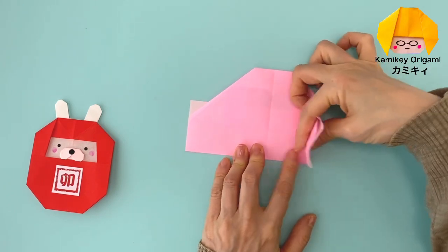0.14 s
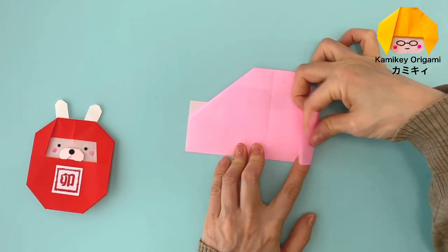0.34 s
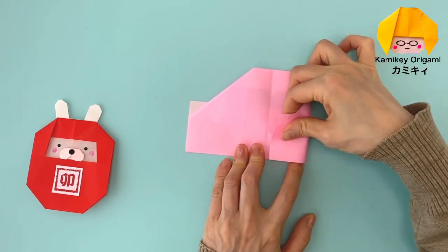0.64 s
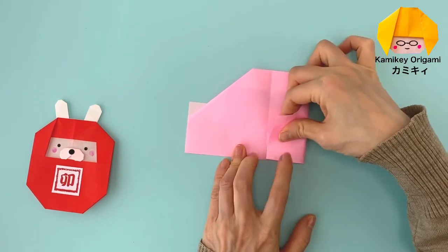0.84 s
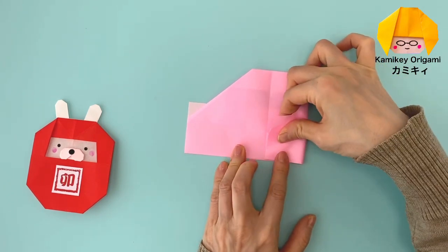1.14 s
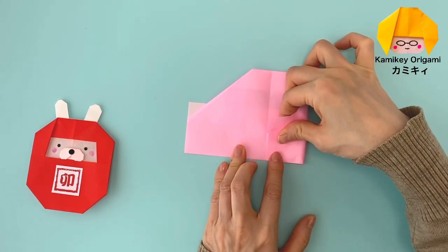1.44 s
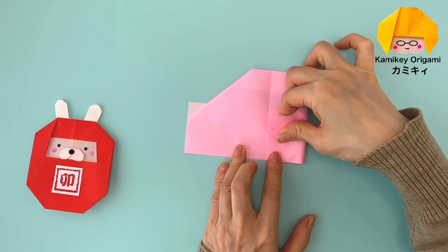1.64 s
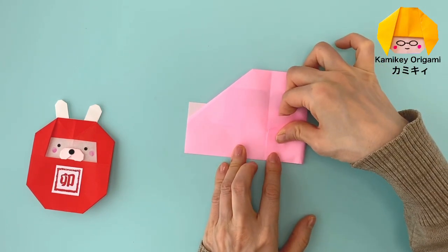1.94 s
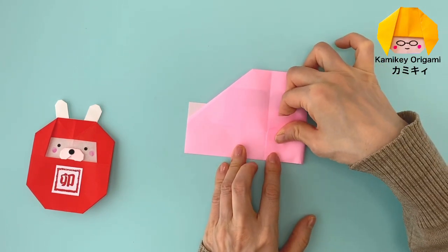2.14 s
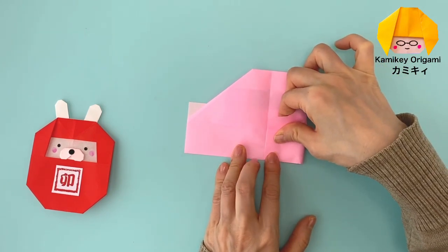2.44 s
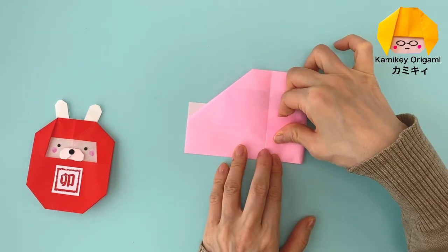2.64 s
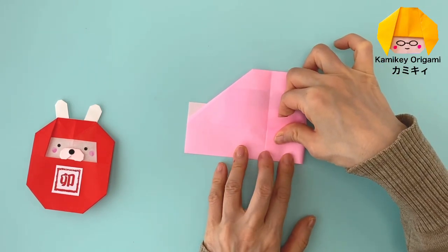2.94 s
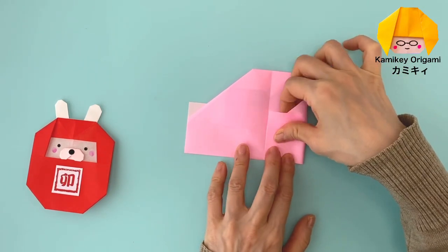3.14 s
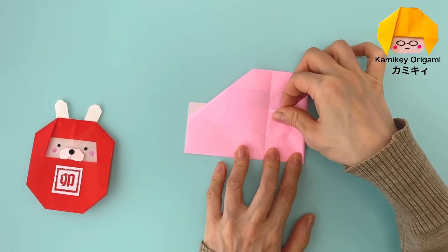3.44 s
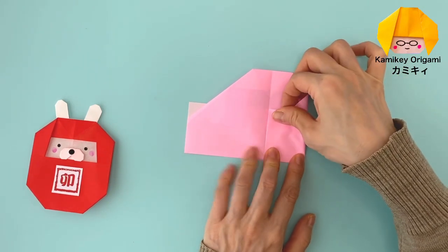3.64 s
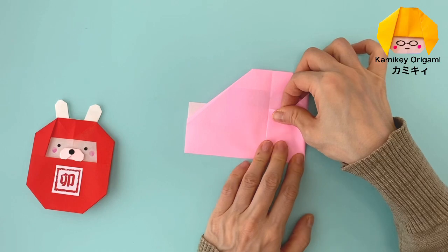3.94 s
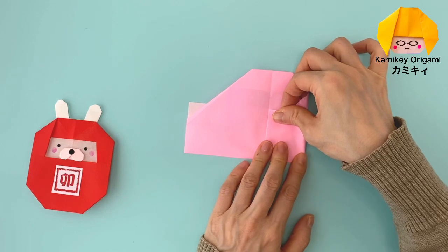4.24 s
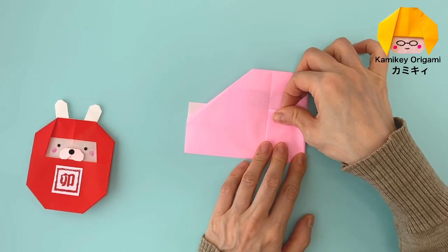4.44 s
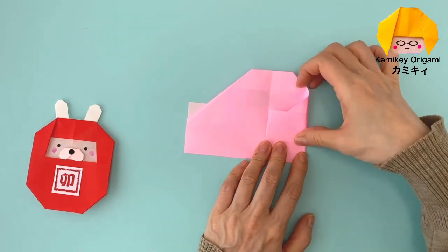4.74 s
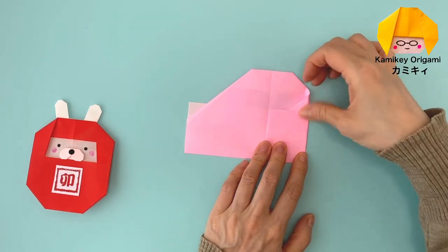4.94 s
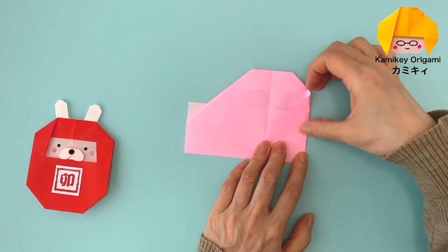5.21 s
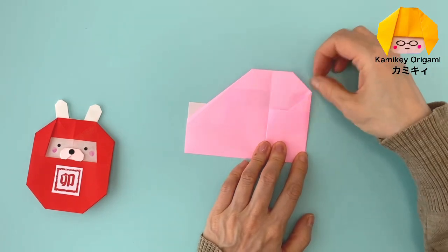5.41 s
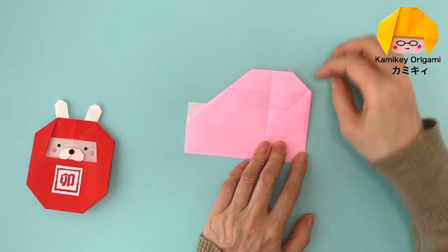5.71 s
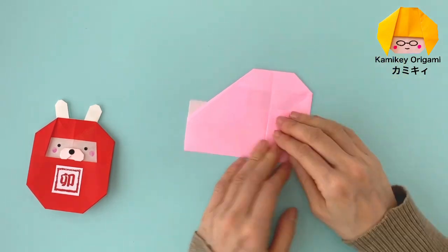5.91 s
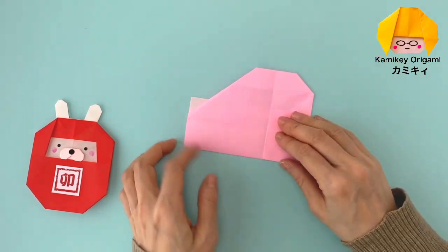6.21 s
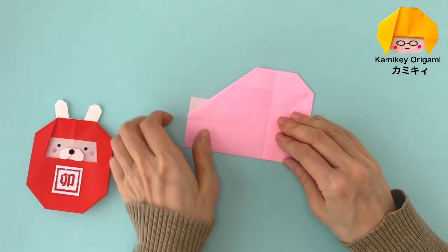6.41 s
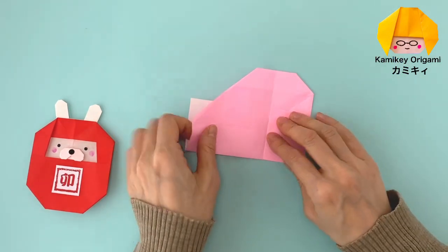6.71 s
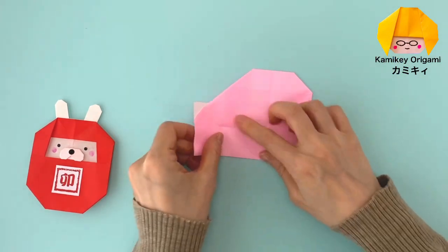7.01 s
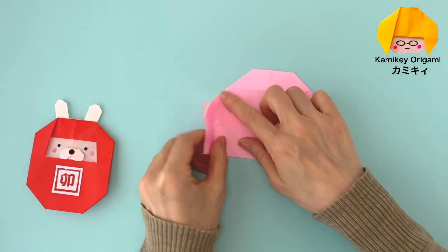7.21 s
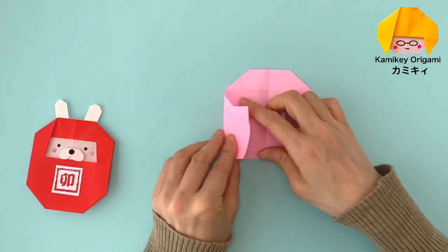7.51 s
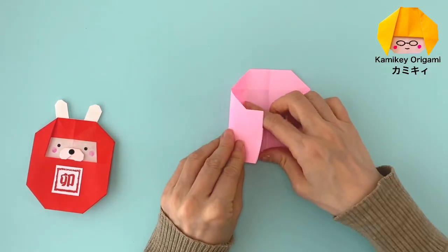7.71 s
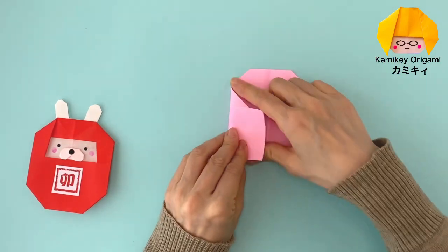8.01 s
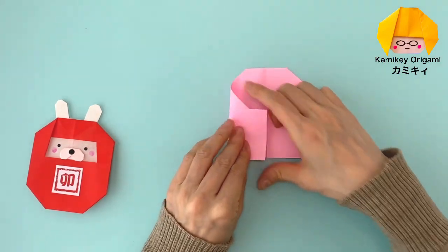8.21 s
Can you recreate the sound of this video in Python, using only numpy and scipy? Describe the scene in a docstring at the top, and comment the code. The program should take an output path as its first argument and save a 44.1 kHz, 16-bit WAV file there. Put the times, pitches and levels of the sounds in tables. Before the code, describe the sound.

Fingers slide over a thin sheet, making dry grainy rustle, soft skin hiss and tiny ringing crinkles. Sharp little cracks mark the paper buckling, and muted thumps mark fingertips landing on the tabletop. Activity is quick at first, sparse for a couple of seconds, intermittent in the middle, and almost continuous near the end. The microphones are near, with a faint short room echo and low rumble beneath.

```python
"""Paper rustles under sliding fingers at once, over a low room rumble, as hands fold a sheet on a table.
Rubbing is grainy noise plus tiny ringing crinkles; each sharp snap is a crack followed by fading noise.
Fingertips land with soft thumps: short noise pushes that sound the resonances of the table top.
A stereo microphone close by hears it all, with the faint short echo of a small quiet room."""
import sys
import numpy as np
from scipy import signal
from scipy.fft import rfft, irfft, next_fast_len
from scipy.io import wavfile
from scipy.ndimage import uniform_filter1d, map_coordinates

SR = 44100
rng = np.random.default_rng(int(sys.argv[2]) if len(sys.argv) > 2 else 0)


def waveform_to_disk(signal):
    """Save audio, clipped to [-1, 1], as 16-bit WAV at the path in sys.argv[1]."""
    frames = np.transpose(np.atleast_2d(signal))
    scaled = np.clip(frames, -1, 1) * 32767
    samples = np.round(scaled).astype(np.int16)
    wavfile.write(sys.argv[1], SR, samples)


N = 368676
T = np.arange(N) / SR  # time of every sample, in seconds

# fingers land on the table: start_s [s], knock_db [dB, peak before a 0.5 dB lift],
# deep_db [dB, deep thud relative to the knock]
LANDINGS = [(0.172, -55, -2), (.227, -59, 2), (.737, -47, -3), (2.846, -66, 10), (2.974, -41, -4),
            (2.997, -51, -0.5), (3.213, -63, 6), (3.299, -63, 11.5), (3.323, -56.5, 5), (3.376, -65, 2.5),
            (4.29, -65, -1), (4.482, -41, -6), (4.505, -55, 11.5), (4.68, -65, 0), (4.848, -58, -12),
            (4.921, -61.5, -7), (5.238, -54, -3), (5.271, -48.5, -7), (5.328, -52, -9), (5.367, -38, -4.5),
            (5.599, -46, -7), (5.823, -50.5, 3), (5.853, -52.5, 1.5), (6.323, -45, -4.5), (6.382, -63, -2),
            (6.541, -60.5, 5), (6.736, -52.5, -9), (6.88, -53, -1), (7.063, -50.5, -12),
            (7.977, -50.5, -17), (8.039, -55.5, 1)]
# colour of rustling paper: pitch_hz [Hz], level_db [dB per Hz]
RUSTLE_COLOUR = [(300, -32), (700, -22.5), (1200, 1), (1700, -2.5), (2400, 1), (3300, -0.5), (4500, 2.5),
                 (7000, 2.5), (9500, -24), (16000, -27.5)]
# the free flap rings higher as the fingers shorten it: time_s [s], pitch_hz [Hz], lift_db [dB]
FLAP_RINGING = [(.3, 2144, 8), (.55, 2900, 6.5), (.95, 2600, 9), (1.2, 2857, 10), (2.6, 2606, -1),
                (3.2, 3666, 9), (4.1, 2896, 4), (4.5, 4400, 7), (4.86, 4560, 5), (5.6, 4000, -1),
                (6.499, 3500, 3), (6.7, 3310, 9), (6.95, 2580, 0.5), (7.2, 2050, 2), (7.38, 3360, 1.5),
                (7.8, 2900, 8.5), (8.129, 3420, 5), (8.299, 2800, 2.5)]


def amp(db):
    """Turn decibels into a gain."""
    return 10 ** (np.asarray(db) / 20)


def unit(x):
    """Scale a sound to an average strength (rms) of 1."""
    return x / np.sqrt(np.mean(x ** 2) + 1e-20)


def along(points, hz):
    """Read a curve of (Hz, value) points, with pitch on a log axis."""
    point_hz, value = np.transpose(points)
    return np.interp(np.log(hz + 1), np.log(point_hz + 1), value)


def wobble(rate):
    """Draw a smooth random curve with this many random points a second."""
    points = rng.standard_normal(int(N * rate / SR) + 4)
    return map_coordinates(points, [T * rate])


def filtered(x, response):
    """Multiply the spectrum of x by a response that depends on frequency."""
    size = next_fast_len(N + SR // 2)
    hz = np.fft.rfftfreq(size, 1 / SR)
    return irfft(rfft(x, size) * response(hz), size)[..., :N]


def coloured(x, db_of_hz, size=4096):
    """Give a short sound a dB curve with a causal filter, so nothing sounds ahead of its cause."""
    cepstrum = irfft(np.log(amp(db_of_hz(np.fft.rfftfreq(size, 1 / SR)))))
    # folding the cepstrum forward in time makes the filter causal
    cepstrum[1:size // 2] *= 2
    cepstrum[size // 2 + 1:] = 0
    return irfft(rfft(x, size) * np.exp(rfft(cepstrum)))


def add(track, start_s, sound):
    """Mix a short sound into the track at a given time."""
    part = track[..., max(round(start_s * SR), 0):][..., :sound.shape[-1]]
    part += sound[..., :part.shape[-1]]


def pair(own, size):
    """Make two white noises; own is the share of power that each has to itself."""
    common, *apart = rng.standard_normal((3, size))
    own = np.clip(own, 0, 1)
    return np.sqrt(1 - own) * common + np.sqrt(own) * np.array(apart)


def sheet_db(hz):
    """Colour the rubbing and snaps with the sheet's resonances and the ripple of nearby echoes."""
    # ringing of the sheet and its surroundings: pitch_hz [Hz], width_hz [Hz], lift_db [dB]
    resonances = [(2040, 200, -0.5), (2221, 64, 8.5), (2535, 99, 8), (3210, 64, 2.5), (3473, 780, 4.5),
                  (4830, 330, -7.5), (5600, 500, 0)]
    # echoes off the table and the stand: delay_s [s], gain [times the direct sound]
    near_echoes = [(.00062, 0.047), (.00105, 0.31), (.0021, .25), (.0034, 0.58)]
    humps = sum(lift_db / (1 + (2 * (hz - pitch_hz) / width_hz) ** 2)
                for pitch_hz, width_hz, lift_db in resonances)
    comb = 1 + sum(gain * np.exp(-2j * np.pi * hz * delay_s) for delay_s, gain in near_echoes)
    return humps + 20 * np.log10(np.abs(comb) + 0.45) - 3


def flap_db(time_s, hz, width_octaves=0.27):
    """Where its lift is positive, the flap radiates best at its resonance and poorly below it."""
    times, flap_hz, lift_db = np.transpose(FLAP_RINGING)
    octaves = np.log2((hz + 1) / np.interp(time_s, times, flap_hz))
    hump = 1 / (1 + (octaves / width_octaves) ** 2)
    loss_below = np.clip(-octaves - .45, 0, .7)
    return np.interp(time_s, times, lift_db) * (hump - .55 - loss_below)


def stroke_levels():
    """Each stroke grips quickly, swells or eases as it slides, then lets go: rustle, hiss, pressure."""
    # skin and paper slide; start_s falls halfway through the grip, swell_db runs from start to end:
    # start_s [s], length_s [s], rustle_db [dB], skin_hiss_db [dB], pressure_db [dB], swell_db [dB]
    slides = [ (0, 0.05, -51.5, -52.5, -60, -15), (0.053, 0.098, -60.5, -60, -80, 7),
              (0.164, 0.11, -47.5, -47.5, -56, -11), (0.282, 0.058, -51.5, -48.5, -75, 3.5),
              (0.349, 0.099, -58, -63, -71.5, 4), (0.487, .11, -58, -59.5, -75, 0),
              (0.611, 0.026, -51, -56, -75, -1), (0.749, 0.074, -66, -63.5, -66.5, 5),
              (0.934, 0.041, -60.5, -65, -92, 6), (1.051, 0.12, -68.5, -76, -95, 4),
              (1.157, .05, -58.5, -59, -67.5, 5.5), (1.352, .05, -70, -88, -80.5, -12),
              (1.525, 0.026, -80.5, -88, -95, 3), (1.772, 0.033, -77.5, -84.5, -94.5, 0),
              (2.272, 0.045, -69, -73, -87, -9), (2.571, 0.039, -75.5, -73, -90, -1),
              (2.724, 0.019, -69.5, -62, -90.5, 4), (2.848, 0.013, -63.5, -54, -80, 4.5),
              (2.923, 0.15, -59, -60, -68, -2), (3.039, 0.074, -58.5, -52.5, -86, 0.5),
              (3.132, 0.12, -56.5, -52, -77, -1.5), (3.304, 0.057, -62.5, -64.5, -66.5, -4),
              (3.43, 0.032, -69, -63.5, -68, 0), (3.598, 0.036, -65, -49.5, -80, 3),
              (3.708, 0.097, -74, -62.5, -83, -13.5), (3.945, 0.041, -74, -75, -96.5, 0),
              (4.073, 0.091, -82.5, -85, -89, -12), (4.287, .025, -81.5, -83, -85, 1),
              (4.481, 0.043, -51.5, -49.5, -61, 3), (4.577, 0.047, -55.5, -49, -64, 8),
              (4.637, 0.071, -52, -59, -57.5, -6.5), (4.808, 0.13, -65.5, -49.5, -67.5, 0.5),
              (4.999, 0.052, -64.5, -56, -70, -6), (5.095, 0.075, -68.5, -62, -73, -3),
              (5.18, 0.055, -62.5, -50, -64, 4.5), (5.267, 0.13, -68.5, -58.5, -59.5, -14),
              (5.441, 0.12, -65.5, -61, -74, 13), (5.571, 0.056, -49.5, -46.5, -50.5, 0.5),
              (5.664, 0.13, -63, -59, -60.5, 6), (5.793, 0.12, -57.5, -52, -58.5, -5.5),
              (5.917, 0.16, -71, -68, -75, -9.5), (6.166, 0.12, -76, -71, -74, -9.5),
              (6.366, 0.042, -68.5, -68, -62.5, 7), (6.455, 0.047, -59, -60, -81, 4),
              (6.5, 0.071, -51.5, -48, -61, 5.5), (6.639, 0.11, -54.5, -50.5, -71.5, 18),
              (6.74, 0.18, -56.5, -60, -74, -6), (6.881, 0.074, -49, -48, -53, -3.5),
              (6.945, 0.21, -56.5, -48, -64.5, -1.5), (7.156, 0.23, -58.5, -58, -65, -10.5),
              (7.34, 0.096, -53.5, -48.5, -68, -3), (7.436, 0.13, -58.5, -58, -77, 4),
              (7.581, 0.068, -60, -65, -61, -2), (7.662, 0.16, -58, -58, -70.5, 7.5),
              (7.808, 0.21, -52.5, -55.5, -64.5, 8), (8.038, 0.13, -55, -54, -71.5, 8),
              (8.175, 0.2, -65, -68.5, -71.5, 0.5)]
    attack_s, release_db_per_s, uneven_db = 0.014, 599.5, 1.1
    # the sheet then settles faintly: level relative to the stroke, and how fast that fades
    settle_db, settle_db_per_s = -13, 128
    power, t = np.zeros((3, N)), np.arange(SR // 2) / SR
    for start_s, length_s, *levels_db, swell_db in slides:
        grip = np.minimum(t / attack_s, 1)
        slide_db = swell_db * (np.minimum(t / length_s, 1) - .5)
        after_s = np.maximum(t - length_s, 0)
        release_db = np.maximum(-release_db_per_s * after_s, settle_db - settle_db_per_s * after_s)
        gains = np.outer(amp(levels_db), grip * amp(slide_db + release_db))
        add(power, start_s - attack_s / 2, gains ** 2)
    return np.sqrt(power) * amp(uneven_db * wobble(45))


def friction(spectrum, grain_db, own, ring=0):
    """Fibres catch and slip: grainy noise of rms 1; ring sets how much flap resonance it takes on."""
    grain = wobble(900) + .6 * wobble(110)
    slips = pair(own, N) * amp(np.clip(grain_db, 1, 3) * grain)
    hz, t, z = signal.stft(slips, SR, nperseg=512)
    # the colour shifts in patches as the fingers travel
    field = uniform_filter1d(rng.standard_normal(z.shape[1:]), size=4, axis=0)
    field = uniform_filter1d(field, size=12, axis=1)
    patches_db = 2.6 * unit(field)
    z = z * amp(patches_db + ring * flap_db(t, hz[:, None]))
    patchy = signal.istft(z, SR, nperseg=512)[1][:, :N]
    return unit(filtered(patchy, lambda f: amp(along(spectrum, f) + sheet_db(f))))


def crinkles(rate, spread_db, ring_t60, scatter_octaves, size=512):
    """Tiny random buckles of rms 1: each small facet rings briefly, its pitch scattered around the flap's."""
    starts = np.flatnonzero(rng.random(N) < rate / SR)
    pitch, strength = np.clip(rng.standard_normal((len(starts), 2)), -2, 2).T
    times, flap_hz, _ = np.transpose(FLAP_RINGING)
    hz = np.interp(starts / SR, times, flap_hz) * 2 ** (scatter_octaves * pitch)
    t = np.arange(size) / SR
    fade = amp(spread_db * strength[:, None] - 60 * t / ring_t60)
    rings = fade * np.cos(2 * np.pi * hz[:, None] * t)
    # add all the rings together, each at its own place
    places = starts[:, None] + np.arange(size)
    ticks = np.bincount(places.ravel(), rings.ravel(), N)[:N]
    return unit(filtered(ticks, lambda f: amp(along(RUSTLE_COLOUR, f) + sheet_db(f))))


def rubbing():
    """Strokes make the sheet rustle and crinkle, the skin hiss and the table murmur under pressure."""
    # colour of sliding skin: pitch_hz [Hz], level_db [dB per Hz]
    skin_colour = [(1500, -30), (3400, -10), (4400, 2.5), (5600, 0), (7000, -1), (8500, -4.5),
                   (10500, -7.5), (12800, 0), (15000, -1), (16300, -9)]
    # colour of the pressed table: pitch_hz [Hz], level_db [dB per Hz]
    press_colour = [(40, -21.5), (100, 3.5), (200, -4.5), (340, 4), (650, -3), (1050, -6), (1600, -4),
                    (4000, -48)]
    rustle, hiss, press = stroke_levels()
    # rate in crinkles a second, ring_t60 in seconds for a 60 dB fade
    ticks = amp(-6.5) * crinkles(rate=260, spread_db=5, ring_t60=.008, scatter_octaves=.55)
    sheet = amp(-2.0) * friction(RUSTLE_COLOUR, grain_db=1.5, own=0.06, ring=0.7) + ticks
    skin = amp(-7.0) * friction(skin_colour, grain_db=2.5, own=0.017)
    table = amp(-5.5) * friction(press_colour, grain_db=3.5, own=0.4)
    return rustle * sheet + hiss * skin + press * table


def rumble(hiss_db=-82, split_hz=200):
    """A nearly mono low rumble swells as the hands lean on the table, under a steady faint hiss."""
    # colour of the background: pitch_hz [Hz], level_db [dB per Hz]
    floor_colour = [(20, -16.5), (40, -10.5), (57, 0.5), (88, -7.5), (120, -10), (200, -20.5), (235, -18.5),
                    (400, -24.5), (1000, -33), (2000, -37.5), (4000, -41.5), (11000, -59.5), (16000, -53.5)]
    # how alike left and right are: pitch_hz [Hz], likeness [1 = the same]
    floor_likeness = [(60, 1), (130, .93), (300, 0.58), (1000, .5), (5000, 0.12)]
    # base level, greatest rise while the hands work, and how slowly it follows them
    rumble_db, rise_db, follow_s = -71, 4, 0.42

    def mid_side_gains(hz):
        angle = np.arccos(np.clip(along(floor_likeness, hz), -1, 1)) / 2
        return amp(along(floor_colour, hz)) * [np.cos(angle), np.sin(angle)]

    mid, side = filtered(rng.standard_normal((2, N)), mid_side_gains)
    air = np.array([mid + side, mid - side])
    low = filtered(air, lambda hz: 1 / (1 + (hz / split_hz) ** 4))
    lean = sum(np.exp(-((T - start_s) / follow_s - .5) ** 2) for start_s, *_ in LANDINGS)
    waver_db = 1.5 * wobble(9)
    swell = amp(rumble_db + rise_db * lean / lean.max() + waver_db)
    return swell * unit(low) + amp(hiss_db) * unit(air - low)


def snaps(flutter_t60=0.022, lead_in_db=-25, flap_ring=0.55, size=2048):
    """Fibres give for a moment, the sheet buckles with a crack, and waves run about it for milliseconds."""
    # the sheet buckles: start_s [s], level_db [dB near 3 kHz, before a 6.5 dB cut],
    # body_db, edge_db, sizzle_db [dB relative to that level, before the colour curve's offsets]
    buckles = [(0.124, -11.5, -6, -30.5, -14), (.1719, 6, -2.5, 9.5, 11.5), (.228, 4, -4.5, -12, -19),
               (0.2542, -10.5, -7.5, -14.5, -10), (.558, -15.5, -23, -13, -34), (.637, 4, -17, 9.5, -9.5),
               (.7377, -8, -26, 3.5, -3.5), (0.8486, -16.5, -5, -2.5, -12), (0.9595, 3, -21.5, -14, -21.5),
               (1.3605, -12, -1, -38, -22), (1.3867, -23.5, -6, -14, -25), (2.2687, -7.5, -10.5, 8.5, 1.5),
               (2.908, -29, -5, 2.5, -4.5), (2.9289, 0.5, -14, -5.5, -17), (2.9449, 1.5, -21, 2.5, -7.5),
               (2.9764, -2.5, 0, -2.5, -7.5), (3.0127, -8, -21, 11, -4), (3.2997, -28, -10, 10, -12),
               (3.3447, -15, -9, -5, -25), (3.656, -7, -4.5, -1.5, -32), (3.8257, -26.5, 8, -21, -35),
               (4.0813, -33, -8, -3.5, -4), (4.1511, -39.5, -8, -8, -11), (4.484, -11, -1, -14, 0),
               (4.5518, -11.5, -7.5, 9, -4), (4.6292, -1, -8.5, 4, -15), (4.6449, 0.5, -12, 4.5, -2.5),
               (4.848, -33, 5, 13, 0), (4.9222, -22.5, 2, 4, -5), (5.105, -16.5, -14, -1, -14),
               (5.1256, -9, -8.5, 1.5, -18), (5.1994, -11, -2, 3, -4), (5.273, -13, 2, 2.5, -16),
               (5.369, -7.5, -3.5, 8, -4), (5.374, -5.5, -15, 13, -26), (5.5262, -16.5, -7.5, -2, -36),
               (5.581, -9, 1, 9.5, -30), (5.6068, -3, -24, 3.5, -8), (5.822, -6.5, -3, -1, -16),
               (6.1755, -36, -6, 15, 15), (6.3203, -34.5, 3, 10, 10), (6.5181, -8.5, -6, 6.5, -26),
               (6.539, -9, 3.5, 2, -31), (6.5501, -7, -0.5, 6.5, -5), (6.7196, -2.5, -2, -35, -25),
               (6.8796, 7, -9, -2.5, -15.5), (6.922, -5, -6.5, -29, -11), (6.9777, -11, -6, 2, -29),
               (7.064, -18, 3, -9, -12), (7.0925, 2, -4, 4.5, 2), (7.117, -6.5, -8.5, -0.5, -5),
               (7.166, -19, 2.5, -14, -10), (7.2251, -11.5, 1.5, 0.5, -5.5), (7.4008, -12.5, 0, 12.5, -7),
               (7.405, -2.5, -7.5, -6, -31), (7.588, 7, -6.5, 5.5, -14), (7.823, -10.5, -1, -6, -12),
               (7.8558, -3, -5, 11.5, 7.5), (7.9103, -6.5, -1.5, 12, 3.5), (7.9781, 6, -6, -1.5, -23),
               (8.0002, 3, -3, -10, -17)]
    # share of energy in the first crack (0-1): strong, bright snaps are the crispest
    crack_share, share_per_db, share_per_edge_db = .52, 0.22, 0.2
    out, t = np.zeros((2, N)), np.arange(size) / SR
    lead = SR // 150  # samples of giving fibres ahead of the crack
    onset = np.exp(-t / .0005)
    for start_s, level_db, body_db, edge_db, sizzle_db in buckles:
        share = np.clip(crack_share + share_per_db * level_db + share_per_edge_db * edge_db, .1, .85)
        crack = (t == 0) + .22 * rng.standard_normal(size) * onset
        flutter = pair(0.026, size) * amp(-60 * t / flutter_t60) * (1 - onset)
        burst = (np.sqrt(share) * unit(crack) + np.sqrt(1 - share) * unit(flutter)) / np.sqrt(size)
        give = amp(lead_in_db) * unit(pair(0.035, lead) * np.linspace(0, 1, lead)) / np.sqrt(lead)
        colour = [(120, body_db - 12.5), (680, body_db - 4), (1450, body_db + 4.5),
                  (1950, 0.0), (3700, 0.05), (6200, edge_db),
                  (9500, (edge_db + sizzle_db) / 2 - 4.5),
                  (14000, sizzle_db + 0.5), (16500, sizzle_db - 12)]

        def snap_db(hz):
            return along(colour, hz) + sheet_db(hz) + flap_ring * flap_db(start_s, hz)

        snap = coloured(np.hstack([give, burst]), snap_db)
        add(out, start_s - lead / SR, amp(level_db - 6.5) * snap)
    return out


def peak_one(x):
    """Scale a sound so that its highest peak is 1."""
    return x / np.abs(x).max()


def thumps(pad_db=-12, pad_hz=950, contact_s=0.033, split_hz=170, size=8192):
    """A soft fingertip knocks the table's resonances; the weight behind it adds a deep thud."""
    # resonances of the table top: pitch_hz [Hz], width_hz [Hz], level_db [dB]
    table_modes = [(63, 18, -6), (110, 45, 3), (228, 40, 0), (336, 50, 1), (430, 140, -8), (540, 120, -9),
                   (900, 300, -17)]
    out, t, hz = np.zeros((2, N)), np.arange(size) / SR, np.fft.rfftfreq(size, 1 / SR)
    wood = 0
    for k, (pitch_hz, width_hz, level_db) in enumerate(table_modes):
        damping = 1j * hz * width_hz
        # neighbouring resonances swing in opposite directions
        wood = wood + (-1) ** k * amp(level_db) * damping / (pitch_hz ** 2 - hz * hz + damping)
    pat = amp(pad_db) / (1 + 1j * hz / pad_hz) ** 2  # the fingertip on the paper itself
    low = 1 / (1 + 1j * hz / split_hz)
    touch = amp(-20 * t / contact_s) * (1 - np.exp(-t / 0.0026))
    for start_s, knock_db, deep_db in LANDINGS:
        push = rfft(pair(0.38, size) * touch) * (wood + pat)
        knock = peak_one(irfft(push * (1 - low) ** 3))
        thud = peak_one(irfft(push * low ** 3))
        add(out, start_s, amp(knock_db + 0.5) * (knock + amp(deep_db) * thud))
    return out


def room(x):
    """Add a faint short tail of fading noise, different at each microphone port."""
    # the room: pitch_hz [Hz], t60_s [s to fade by 60 dB], level_db [dB]
    walls = np.array([(100, 0.25, -20.5), (560, 0.033, 0), (1200, .17, -11), (4000, 0.17, -19.5),
                      (14000, 0.077, -31.5)])
    hz, t, z = signal.stft(rng.standard_normal((2, SR // 3)), SR, nperseg=256)
    t60_s = along(walls[:, :2], hz)[:, None]
    level_db = along(walls[:, ::2], hz)[:, None]
    even_energy = np.sqrt(2 * np.log(1000) / (t60_s * SR))  # long fades get no extra energy
    tail = signal.istft(z * amp(level_db - 60 * t / t60_s) * even_energy, SR, nperseg=256)[1]
    delayed = np.pad(tail, ((0, 0), (SR // 250, 0)))
    return signal.fftconvolve(x, delayed, axes=1)[:, :N]


def scene(mono_hz=260):
    """The paper lies a little to the left, so it reaches the right port later; long waves reach both alike."""
    # lead of the left port: pitch_hz [Hz], lead_rad [radians]
    left_lead = [(100, 0), (1200, .1), (2000, .35), (2700, .65), (4000, 1.1), (5600, 1.75), (8000, 2.65),
                 (10000, 3.14), (13600, 4.2), (16500, 5.6)]
    paper = rubbing() + snaps() + thumps()
    direct = filtered(paper, lambda hz: np.exp(np.outer([1j, -1j], along(left_lead, hz) / 2)))
    left, right = direct + room(direct)
    mid = (left + right) / 2
    side = filtered((left - right) / 2, lambda hz: hz / np.hypot(hz, mono_hz))
    balance = amp([[-.15], [.15]])
    return np.array([mid + side, mid - side]) * balance + rumble()


def record(dry, top_hz=15900):
    """Cut the sound off steeply above its band limit."""
    return filtered(dry, lambda hz: 1 / np.sqrt(1 + (hz / top_hz) ** 200))


dry = scene()
out = record(dry)
waveform_to_disk(out)
```